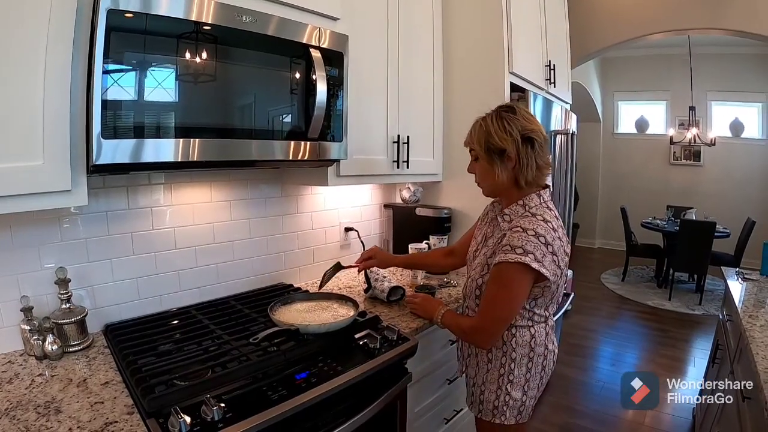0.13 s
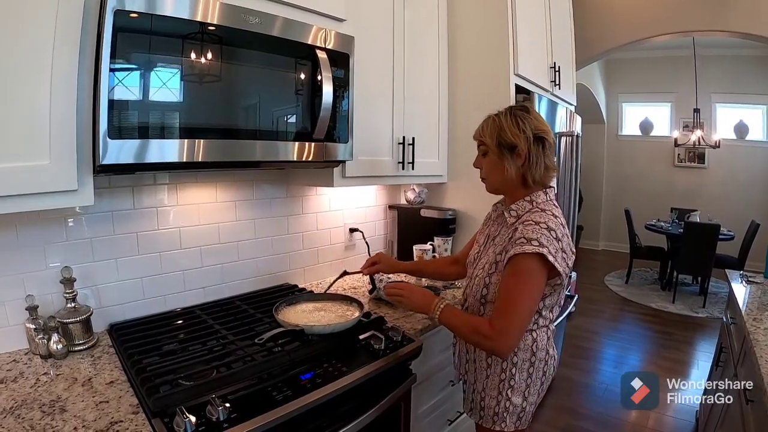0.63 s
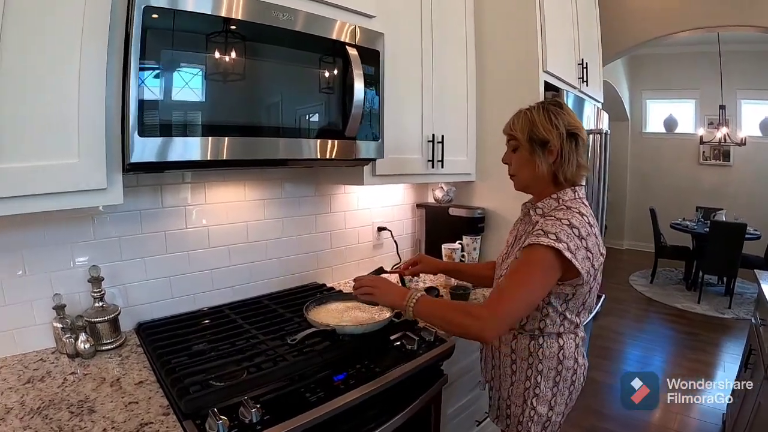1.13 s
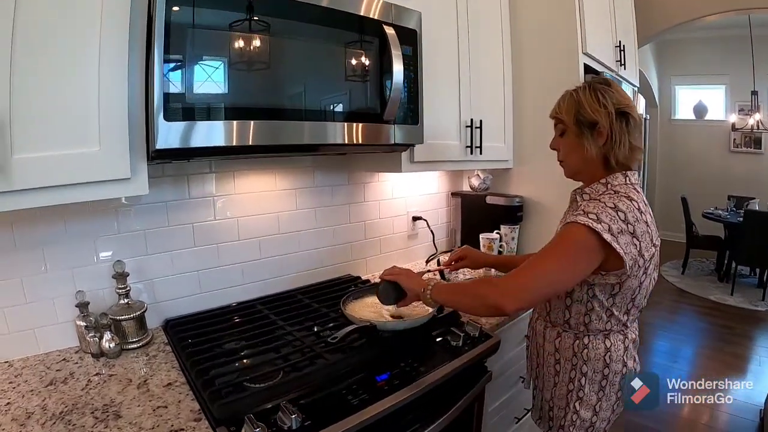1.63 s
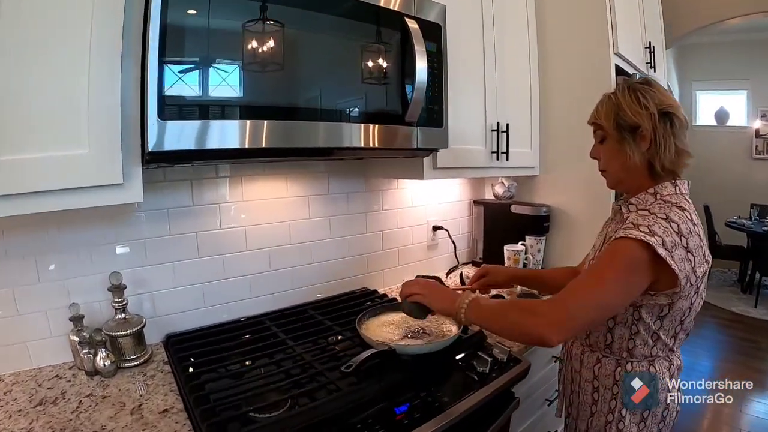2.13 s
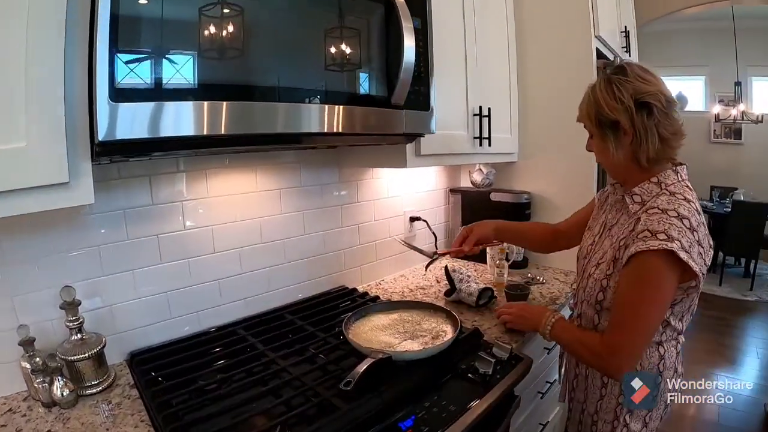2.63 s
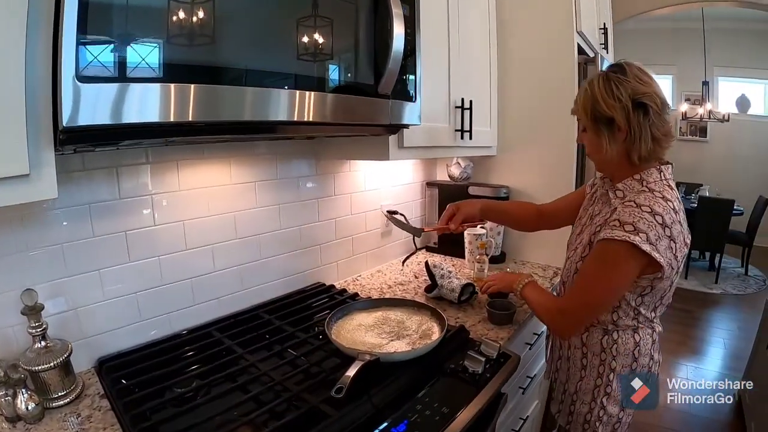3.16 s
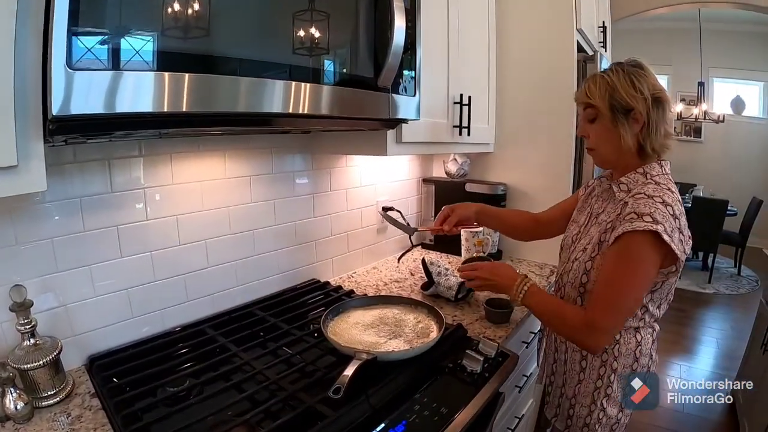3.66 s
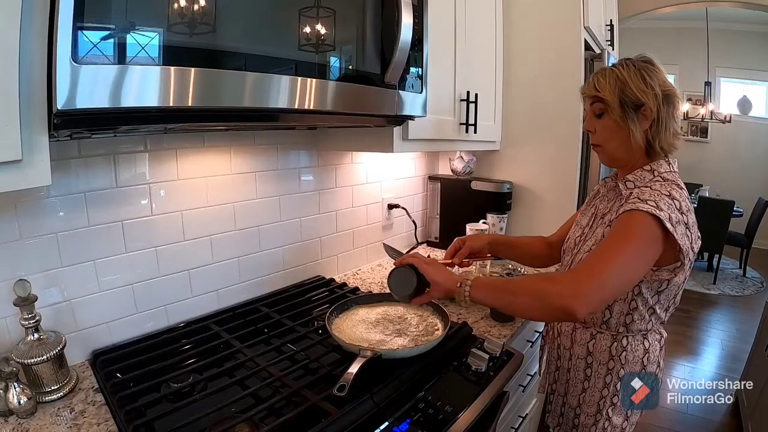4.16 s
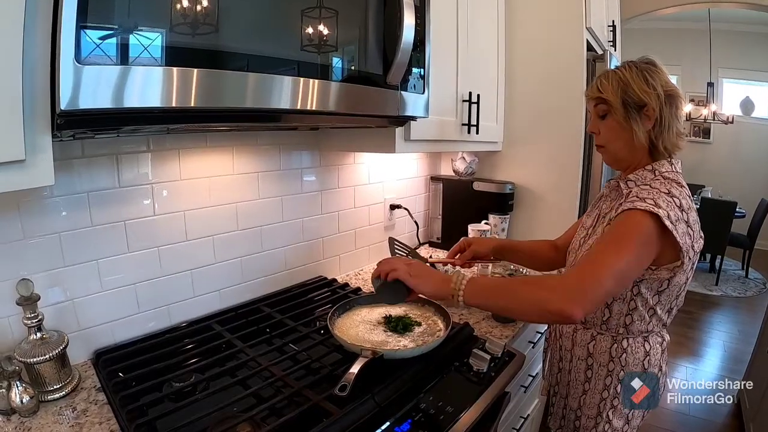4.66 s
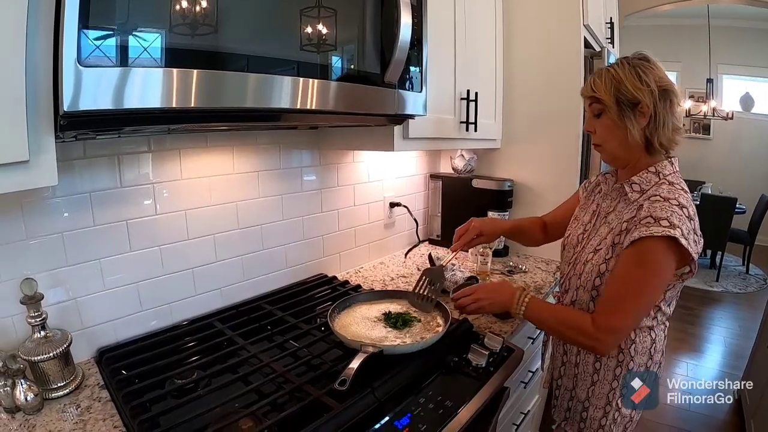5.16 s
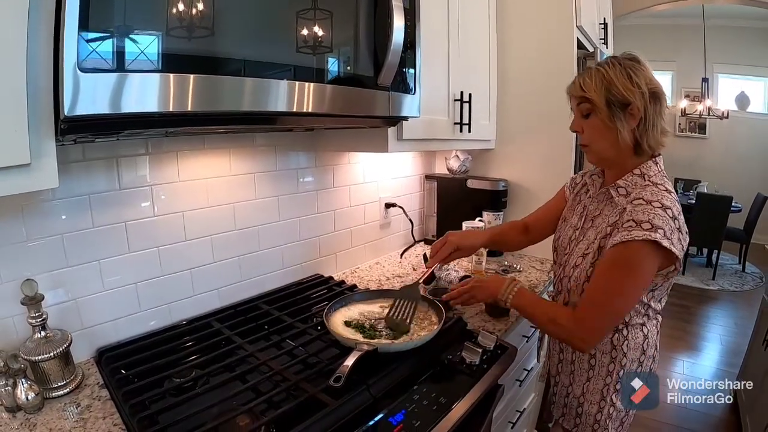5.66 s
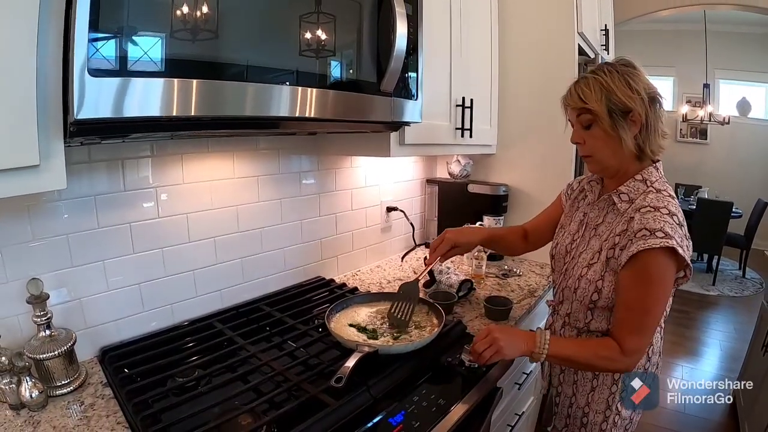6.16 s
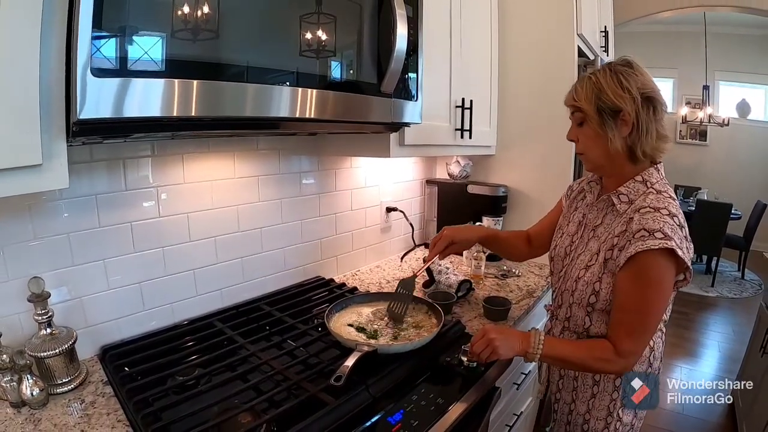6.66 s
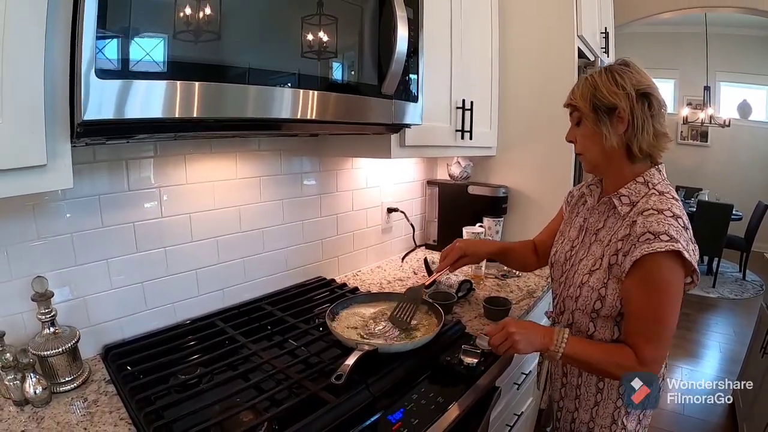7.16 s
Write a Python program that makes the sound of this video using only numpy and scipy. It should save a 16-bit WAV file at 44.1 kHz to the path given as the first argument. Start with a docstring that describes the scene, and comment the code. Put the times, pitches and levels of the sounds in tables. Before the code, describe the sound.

In a hard-walled open kitchen, a low house hum sits under a faintly sizzling sauce. Fat spits and utensils tick, seasoning brings a small puff of steam, and a bowl clacks loudly on stone. The sizzle then surges and stays strong; a second bowl knock follows and a spatula rubs the pan. Stereo camera microphone a short way off, with audible room echo.

```python
"""The house hums throughout; a butter and flour sauce on a gas stove sizzles, quietly at first.
Fat spits and utensils tick (damped sines, short noise); at 2.2 s seasoning adds a puff of steam (noise).
At 2.8 and 5.5 s small bowls strike a stone counter (decaying modes, noise clatter); gain drops after loud blows.
From 4 s the sizzle (noise plus bubble grains) is much louder; from 5.4 s a spatula rubs the pan (resonant noise).
A hard-walled open kitchen answers spits, ticks and bowls."""
import sys
import numpy as np
from scipy import signal
from scipy.fft import rfft, irfft, next_fast_len
from scipy.io import wavfile
from scipy.ndimage import uniform_filter1d, minimum_filter1d, map_coordinates

SR = 44100
rng = np.random.default_rng(int(sys.argv[2]) if len(sys.argv) > 2 else 0)


def store_pcm(level_fs):
    """Save levels as 16-bit WAV."""
    pcm = np.round(np.clip(level_fs, -1, 1) * 32767).astype(np.int16)
    wavfile.write(sys.argv[1], SR, np.atleast_2d(pcm).T)


def linear_from_db(decibels):
    """Turn decibels (scalar or array-like) into linear amplitude factors; 0 gives 1."""
    return 10 ** (np.asarray(decibels, float) / 20)


N = 321826


def unit(x):
    """x at rms 1."""
    return x / np.sqrt(np.mean(x ** 2) + 1e-20)


def along(points, hz):
    """(Hz, value) points interpolated on a log frequency axis."""
    f, v = np.transpose(points)
    return np.interp(np.log(hz + 1), np.log(f + 1), v)


def curves(rows):
    """One value per sample for each column after the time."""
    s, *cols = np.transpose(rows)
    return [np.interp(np.arange(N) / SR, s, c) for c in cols]


def wobble(knots_per_s):
    """Smooth random curve through normally distributed knots."""
    knots = rng.standard_normal(N // 200)
    return map_coordinates(knots, [np.arange(N) * knots_per_s / SR])


def bump(at_s, half_s):
    """Bell-shaped swell in time, top 1, 1/e at half_s from the top."""
    return np.exp(-((np.arange(N) / SR - at_s) / half_s) ** 2)


def filtered(x, response):
    """x through a complex response of frequency."""
    m = next_fast_len(N + SR // 2)
    return irfft(rfft(x, m) * response(np.fft.rfftfreq(m, 1 / SR)), m)[..., :N]


def resonances(peaks):
    """Causal response of (Hz, width Hz, dB) second-order peaks, alternating in sign."""
    def peak(f, centre, width, db):
        return linear_from_db(db) * 1j * f * width / (centre * centre - f * f + 1j * f * width)
    return lambda f: sum((-1) ** k * peak(f, *p) for k, p in enumerate(peaks))


def patchy(depth_db):
    """Two white noises sharing a gain that varies in patches of time and frequency; rms 1."""
    z = signal.stft(rng.standard_normal((2, N + SR)), nperseg=256)[2]
    field = uniform_filter1d(rng.standard_normal(z.shape[1:]), size=5, axis=0)
    field = uniform_filter1d(field, size=12, axis=1)
    return unit(signal.istft(z * linear_from_db(depth_db * unit(field)), nperseg=256)[1][:, :N])


# left-right correlation: (frequency [Hz], correlation [-])
LIKENESS = [(60, 1), (120, 0.9), (240, 0.93), (480, 0.66), (950, 0.86), (1890, 0.79), (3770, 0.81),
            (7520, 0.32), (15000, 0.25)]
# left over right: (frequency [Hz], level [dB])
LEAN = [(60, 1.5), (120, -0.7), (240, 1.2), (480, -0.5), (950, 0.32), (1890, 2.2), (3770, 1.2),
        (7520, -1.0), (15000, -3)]
# phase by which left leads: (frequency [Hz], phase [rad])
LEAD = [(100, 0), (1500, -.4), (5500, -.8), (9000, -1.1), (13000, -2.5)]


def ports(pair, spectrum):
    """Two unrelated signals, coloured and mixed to two microphone ports by likeness, lean, lead; rms 1."""
    def spread(hz):
        turn = np.arccos(np.clip(along(LIKENESS, hz), -1, 1)) / 2
        return linear_from_db(along(spectrum, hz)) * [np.cos(turn), np.sin(turn)]

    def tilt(hz):
        half = linear_from_db(along(LEAN, hz) / 2) * np.exp(0.5j * along(LEAD, hz))
        return [half, 1 / half]

    mid, side = filtered(pair, spread)
    return unit(filtered(np.array([mid + side, mid - side]), tilt))


def grains(start_s, size, pitch_hz, life_cycles, order):
    """Damped sines on one track; life_cycles is cycles per 1/e of decay, order the length in samples."""
    k = np.arange(order)
    turns = k * (pitch_hz / SR)[:, None]
    decay = np.exp(-turns / life_cycles[:, None])
    onset = 1 - np.exp(-2 * turns)
    rows = size[:, None] * np.sin(2 * np.pi * turns) * decay * (1 - k / order) * onset
    at = np.round(start_s * SR).astype(int)[:, None] + k
    return np.bincount(at.ravel(), rows.ravel(), N + order)[:N]


def bursts(count, centre_hz, spread, life_cycles, size_db, order):
    """Two whitened tracks of randomly timed bubble grains, log-normal pitch, exponential dB size."""
    pair = []
    for _ in range(2):
        when, draw = rng.random(count) * N / SR, rng.standard_normal(count)
        size = linear_from_db(size_db * np.minimum(rng.exponential(size=count), 3.5))
        pitch_hz = centre_hz * np.exp(spread * draw)
        pair.append(grains(when, size, pitch_hz, np.full(count, life_cycles), order))
    # flatten the overall colour; the layer's spectrum sets it
    z = rfft(pair)
    power = uniform_filter1d(np.abs(z) ** 2, size=2000)
    return unit(irfft(z / np.sqrt(np.abs(power) + 1e-9), N))


def rings(modes, t, wander):
    """Decaying (Hz, dB, t60 s) modes; phase drifts at random, wander in rad per root second."""
    steps = uniform_filter1d(rng.standard_normal((len(modes), len(t))), size=60, axis=1)
    drift = wander / np.sqrt(SR) * np.cumsum(steps, axis=1)
    return sum(linear_from_db(db - 60 * t / t60_s) * np.sin(2 * np.pi * hz * t + d)
               for (hz, db, t60_s), d in zip(modes, drift))


# house noise spectrum: (frequency [Hz], level [dB])
HOUSE_SPECTRUM = [(35, -30), (60, -7), (70, -0.5), (112, 7.5), (144, -5.5), (213, -8.5), (248, -3.5),
                  (329, -12), (422, -13), (559, -23.5), (584, -20.5), (630, -26), (800, -27), (1040, -55),
                  (1760, -120)]
# lowest rumble resonances: (frequency [Hz], width [Hz], level [dB])
RUMBLE_PEAKS = [(23.8, 21, -5), (39.5, 15, 3.5)]
# hum level: (time [s], level [dB])
HUM_LEVEL = [(0, -57), (2, -55), (4.5, -59), (7.3, -61)]
# low-end rises and dips: (time [s], half length [s], rumble gain [dB], boom gain [dB])
LOW_SWELLS = [(0.727, 0.092, -8, 11.5), (1.02, 0.14, 5, -11), (1.7, 0.15, -14, 0), (2.07, 0.096, 5, 0),
              (4.014, 0.29, 8, 12), (4.497, 0.11, 5, 3), (5.003, 0.17, -8, 12), (6.194, 0.2, 4, 7),
              (6.95, 0.2, -8.5, 0)]


def house():
    """Flame, appliances and air handling: noise as rumble, boom and hum, plus a 120 Hz mains tone."""
    hum_db, = curves(HUM_LEVEL)
    rumble_db, boom_db = sum(bump(s, half_s) * np.array([[low_db], [mid_db]])
                             for s, half_s, low_db, mid_db in LOW_SWELLS)
    below = lambda hz, edge_hz: 1 / (1 + (hz / edge_hz) ** 8)
    noise = ports(patchy(2.36), HOUSE_SPECTRUM)
    flat = ports(patchy(0.71), [(20, 0)])
    rumble = unit(filtered(flat, lambda hz: resonances(RUMBLE_PEAKS)(hz) * below(hz, 71)))
    rumble *= linear_from_db(-56 + rumble_db + 0.98 * wobble(6.8))
    boom = unit(filtered(noise, lambda hz: below(hz, 138) - below(hz, 67.4)))
    boom *= linear_from_db(-65.5 + boom_db + 3.26 * wobble(17))
    hum = unit(filtered(noise, lambda hz: 1 - below(hz, 134))) * linear_from_db(hum_db + 0.4 * wobble(4))
    mains = linear_from_db(-69 + 2.8 * wobble(2.7)) * np.sin(2 * np.pi * 120 * np.arange(N) / SR)
    return rumble + boom + hum + mains


# vigour of the sizzle: (time [s], fizz level [dB])
FIZZ_LEVEL = [(0.0, -50), (1.59, -57.5), (1.95, -54), (2.17, -47), (2.88, -49), (3.17, -48), (3.53, -46.5),
              (3.76, -44), (4.25, -37), (4.9, -32.5), (5.26, -30), (5.69, -29.5), (6.16, -28.5),
              (6.63, -26.5), (7.3, -28.5)]
# steam relative to fizz: (time [s], level [dB])
STEAM_LEVEL = [(0.0, -6), (1.9, -5), (2.5, -15.5), (2.88, -12.5), (3.17, -16.5), (3.5, -9.5), (4.25, -9.5),
               (4.9, -7), (5.3, -9), (7.3, -8)]
# spectra of the three layers: (frequency [Hz], level [dB])
FIZZ_SPECTRUM = [(880, -27), (1500, -18.5), (1740, -18), (1920, -4.5), (2370, -5.5), (2550, -3),
                 (3150, -2.5), (3390, -1.5), (4150, -2.5), (4650, -6.5), (5650, -12.5), (7500, -20),
                 (9750, -49), (16500, -120)]
STEAM_SPECTRUM = [(2940, -28.5), (5000, -11), (5680, -7), (6900, -15), (8690, -10.5), (12800, -26),
                  (14600, -29), (15500, -13.5)]
BUBBLING_SPECTRUM = [(260, -23), (450, -23), (615, -20), (675, -12), (765, -15), (861, -12.5), (1170, 1),
                     (1730, -3.5), (2000, -6.5), (2600, -4), (4400, -120)]
# steam puff of the seasoning: (peak level [dB], rise [s], t60 [s])
SEASONING_PUFF = (-46.5, 0.11, 2.14)


def sauce():
    """Small bubbles fizz, steam hisses, big bubbles pop: noise plus grains under a shared surge."""
    (fizz_db,), (steam_db,), t = curves(FIZZ_LEVEL), curves(STEAM_LEVEL), np.arange(N) / SR
    surge_db = 0.55 * wobble(30) + 0.5 * wobble(55) + 0.5 * wobble(110)
    small = bursts(count=14000, centre_hz=3300, spread=0.328, life_cycles=4.7, size_db=2, order=220)
    fizz = ports(patchy(0.74) + 0.46 * small, FIZZ_SPECTRUM)
    tiny = bursts(count=14000, centre_hz=9000, spread=0.61, life_cycles=4.1, size_db=1.5, order=48)
    steam = ports(patchy(1.3) + 0.71 * tiny + 0.24 * small, STEAM_SPECTRUM)
    big = bursts(count=3000, centre_hz=1433, spread=0.378, life_cycles=3.9, size_db=-0.5, order=400)
    bubbling = ports(patchy(1.53) + 0.28 * big, BUBBLING_SPECTRUM)
    puff_db, rise_s, t60_s = SEASONING_PUFF
    puff_s = 2.18
    fall = linear_from_db(-60 * np.abs(t - puff_s) / t60_s)
    puff = linear_from_db(puff_db) * np.where(t < puff_s, bump(puff_s, rise_s), fall)
    steam *= np.hypot(linear_from_db(fizz_db + steam_db), puff) * linear_from_db(0.86 * surge_db + 0.6 * wobble(30))
    # power sum of a steady -64 dB simmer and a part 11.5 dB under the fizz
    bubbling *= np.hypot(linear_from_db(-64), linear_from_db(fizz_db - 11.5)) * linear_from_db(0.87 * surge_db)
    return linear_from_db(fizz_db + surge_db) * fizz + steam + bubbling


# timed spits of fat: (time [s], level [dB], pitch [Hz])
TIMED_SPITS = [(1.1492, -44, 3620), (2.0037, -27.5, 3690), (2.0686, -36, 3970), (2.1469, -33, 3200),
               (2.4677, -32, 3260), (2.5126, -29, 5720), (2.5863, -36, 3870), (2.6687, -27, 3570),
               (2.7985, -30, 3800), (3.0345, -35, 3600), (3.1233, -35, 3730), (3.1486, -33, 3300),
               (3.2607, -32, 3580), (3.3322, -32, 3680), (3.5308, -35, 4060), (3.8196, -31, 3650),
               (3.8765, -34, 3370), (4.0142, -25.5, 3380), (4.522, -27, 3530), (4.6752, -22, 3330)]


def spits():
    """Each spit is a short ring, a higher snap and two weaker after-bursts; 40 more come at random."""
    when, draw = rng.random(40) * (N - SR // 10) / SR, rng.standard_normal((40, 2))
    stray_db = np.interp(when, *np.transpose(FIZZ_LEVEL)) + 0.5 + 3 * draw[:, 0]
    stray = np.transpose([when, stray_db, 3300 * np.exp(0.14 * draw[:, 1])])
    s, db, hz = np.transpose(np.vstack([TIMED_SPITS, stray]))
    late = rng.random((len(s), 2)).T
    *detune, lean = rng.standard_normal((len(s), 3)).T
    left_over_right_db = 1.5 + 3 * lean
    life_cycles, snap_cycles = np.full(len(s), 6.3), np.full(len(s), 1.2)
    out = []
    for side in (0.5, -0.5):
        size = linear_from_db(db + side * left_over_right_db)
        ring = grains(s, size, hz, life_cycles, order=500)
        snap = grains(s, 0.5 * size, 2.4 * hz, snap_cycles, order=60)
        after = sum(grains(s + 0.007 * a, 0.8 * size, hz * np.exp(0.05 * d), life_cycles, order=500)
                    for a, d in zip(late, detune))
        out.append(ring + snap + after)
    return np.array(out)


# utensil ticks: (time [s], level [dB], pitch [Hz], decay [cycles], rattle over ring [dB])
UTENSIL_TICKS = [(1.2058, -43, 2310, 2.7, 2.5), (1.5953, -36.5, 2470, 1.1, 0.5),
                 (1.6442, -30, 1300, 1.1, -7.5), (2.14, -42.5, 2580, 2.7, 10),
                 (2.6975, -36.5, 2330, 3.3, 4), (3.4668, -37, 1390, 14, -1)]


def ticks():
    """Utensils, left of centre, scuff, then touch: rising noise, then a damped ring and broad rattle."""
    out, t = np.zeros((2, N + SR)), np.arange(-SR // 20, SR // 20) / SR
    after = np.maximum(t, 0)
    left_over_right_db = 5
    for s, db, hz, cycles, rattle_db in UTENSIL_TICKS:
        ring = np.sin(2 * np.pi * hz * after) * np.exp(-hz * after / max(cycles, 0.5))
        shape = np.where(t < 0, linear_from_db(-10.5 + 60 * t / 0.3), linear_from_db(-60 * t / 0.082))
        rattle = linear_from_db(rattle_db) * shape * rng.standard_normal(len(t))
        gain = linear_from_db(db + left_over_right_db * np.array([[0.5], [-0.5]]))
        out[:, round(s * SR) - SR // 20:][:, :len(t)] += gain * (ring + rattle)
    return filtered(out[:, :N], lambda hz: resonances([(2400, 4500, 0)])(hz) ** 2)


# bowls meeting the counter: (time [s], level [dB], thud level [dB], clatter over level [dB])
BOWL_KNOCKS = [(2.826, -10.5, -32, 6), (5.5016, -12, -32, -1.5)]
# ring of each bowl, one list per knock: (frequency [Hz], level [dB], t60 [s])
BOWL_MODES = [
    [(1027, -19.5, 0.14), (1302, -3.5, 0.033), (1680, -42, 0.041), (1921, -7.5, 0.1), (2314, 2.5, 0.03),
     (2458, -7.5, 0.066), (4310, -20, 0.065), (6142, -34.5, 0.25), (7400, -39, .04)],
    [(1103, -6, 0.023), (1447, -0.5, 0.029), (1540, 1.5, 0.031), (1900, -25.5, 0.064), (2070, 14.5, 0.005),
     (2310, 0, 0.051), (2330, -2, 0.035), (2500, -26, 0.019), (4170, -0.5, 0.015), (5750, -24, 0.07)],
]
# counter and cabinet: (frequency [Hz], level [dB], t60 [s])
COUNTER_MODES = [(125, 4, 0.19), (164, -11.5, 0.23), (262, -10, 0.15), (325.6, -11.5, 0.48),
                 (484, -25, 0.72), (570, -17, 0.2), (716, -17, 0.29), (813, -15, 0.24)]


def bowls():
    """A bowl clatters on stone and rings at its modes; the counter's modes swell into a thud."""
    ring, clatter, thud = np.zeros((3, N + SR))
    t = np.arange(SR // 2) / SR
    rise = 1 - np.exp(-t / 0.0006)
    for (s, db, thud_db, clatter_db), modes in zip(BOWL_KNOCKS, BOWL_MODES):
        at = slice(round(s * SR), round(s * SR) + len(t))
        ring[at] += linear_from_db(db) * rings(modes, t, wander=16) * rise
        clatter[at] += linear_from_db(db + clatter_db - 60 * t / 0.072) * rise * rng.standard_normal(len(t))
        thud[at] += linear_from_db(thud_db) * (1 - np.exp(-t / 0.01)) * rings(COUNTER_MODES, t, wander=22)
    stone = resonances([(1318, 660, 0), (2280, 1120, 0)])
    bowl = ring[:N] + filtered(clatter[:N], lambda hz: stone(hz) ** 3)
    # a small bowl radiates nothing low
    bowl = signal.sosfilt(signal.butter(4, 950, "high", fs=SR, output="sos"), bowl)
    return bowl + thud[:N]


# spatula strokes: (time [s], length [s], rubbing level [dB])
SPATULA_STROKES = [(5.434, 0.17, -46), (6.034, 0.11, -45), (6.187, 0.14, -58), (6.46, 0.11, -47),
                   (6.63, 0.12, -55.5), (6.862, 0.043, -39.5), (6.944, 0.083, -52)]
# pan resonances: (frequency [Hz], width [Hz], level [dB])
PAN_PEAKS = [(681, 53, 9.5), (778, 75, 10.5)]


def spatula():
    """Rubbing noise of uneven grip excites two low pan resonances; a light drag links the strokes."""
    t = np.arange(N) / SR
    gate = lambda s, width_s: 0.5 + 0.5 * np.tanh(s / width_s)
    level = sum(linear_from_db(db) * gate(t - s, 0.025) * gate(s + length_s - t, 0.028)
                for s, length_s, db in SPATULA_STROKES)
    level = level + linear_from_db(-61.5) * gate(t - SPATULA_STROKES[0][0], 0.1)
    pan = resonances(PAN_PEAKS)
    grip = linear_from_db(2.3 * wobble(30))
    rub = filtered(patchy(0.85) * grip, lambda hz: pan(hz) * np.abs(pan(hz)) ** 0.31)
    return level * unit(rub[0] + 0.21 * rub[1] * np.array([[1], [-1]]))


# reverberation of the room: (frequency [Hz], t60 [s])
KITCHEN_DECAY = [(150, 0.16), (1000, 0.69), (2500, 0.66), (5000, 0.46), (10000, 0.51)]


def kitchen(x, cut_s):
    """Near walls answer weakly, far rooms strongly from 41 ms; separate noise tails before and after cut_s."""
    out = np.zeros((2, N))
    for part in (np.arange(N) < cut_s * SR, np.arange(N) >= cut_s * SR):
        noise = rng.standard_normal((2, SR))
        noise = np.array([noise[0] + 0.6 * noise[1], noise[0] - 0.48 * noise[1]])
        hz, t, z = signal.stft(noise, SR, nperseg=128)
        swell = 0.5 * (1 - np.exp(-t / 0.006)) + 0.5 * (t > 0.041)
        decay = linear_from_db(-60 * t / along(KITCHEN_DECAY, hz)[:, None])
        tail = signal.istft(z * swell * decay, SR, nperseg=128)[1]
        tail /= np.linalg.norm(tail[0])
        # slaps from two flat far walls
        tail[:, [round(0.0415 * SR), round(0.056 * SR)]] += [0.25, 0.15]
        out += signal.fftconvolve(x * part, tail, axes=1)[:, :N]
    return out


def scene():
    """House, sauce and spatula, plus spits, ticks and bowls with dulled treble and room echo."""
    dull = lambda x: signal.sosfilt(signal.butter(2, 6500, fs=SR, output="sos"), x)
    pops = dull(spits() + ticks())
    knock = dull(bowls()) * linear_from_db([[0.7], [-0.7]])
    echo = kitchen(linear_from_db(-2.0) * knock + linear_from_db(-7) * pops, cut_s=4.9)
    return house() + sauce() + pops + knock + spatula() + echo


def top_cut(x):
    """Nothing passes above the cut-off."""
    return signal.sosfilt(signal.butter(12, 15630, fs=SR, output="sos"), x)


def record(dry):
    """The camera's limiter ducks a few ms after peaks over -14 dB, holds 55 ms, recovers; band limit."""
    need_db = np.minimum(0, -14 - 20 * np.log10(np.abs(dry).max(0) + 1e-9))
    hold = round(0.055 * SR)
    held_db = minimum_filter1d(need_db, hold, origin=(hold - 1) // 2)

    def lag(x, tau_s):
        pole = np.exp(-1 / (tau_s * SR))
        return signal.lfilter([1 - pole], [1, -pole], x)

    released_db = np.minimum(held_db, lag(held_db, 0.022))
    # 0.3 of the excess is taken off
    mix = dry * linear_from_db(0.3 * lag(released_db, 0.005))
    mix = filtered(mix, lambda hz: hz < 15600)
    return top_cut(mix)


dry = scene()
out = record(dry)
store_pcm(out)
```